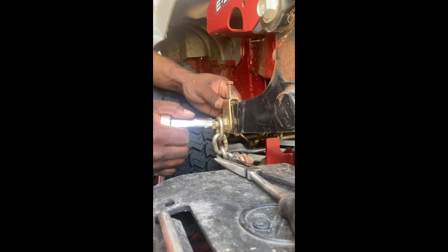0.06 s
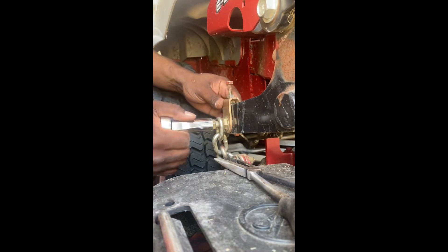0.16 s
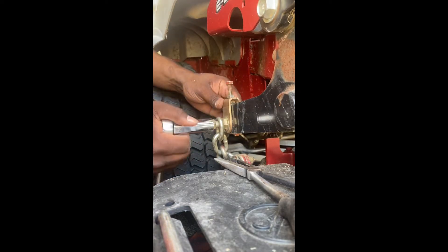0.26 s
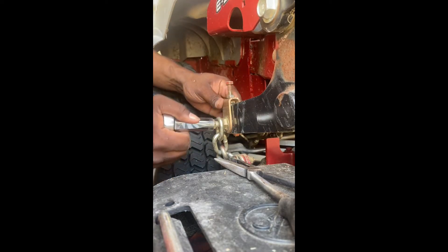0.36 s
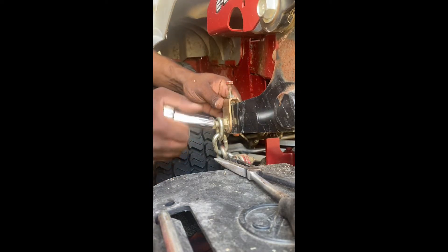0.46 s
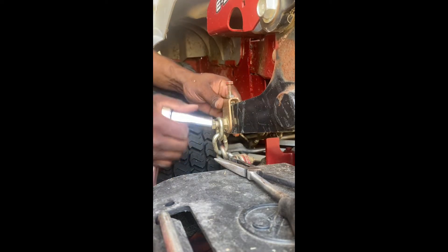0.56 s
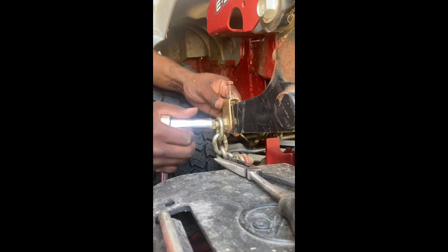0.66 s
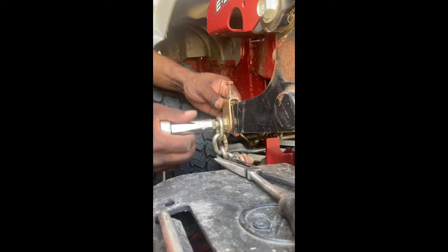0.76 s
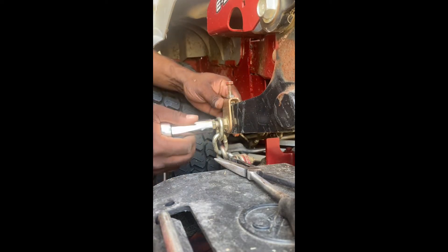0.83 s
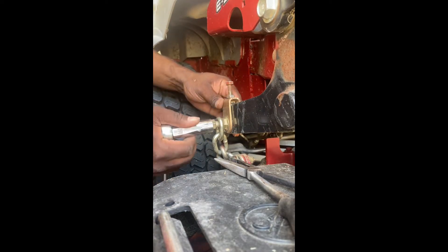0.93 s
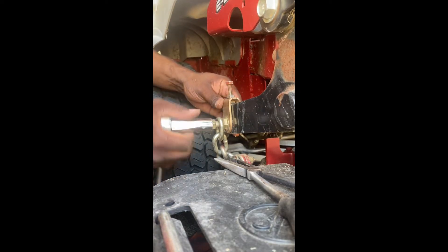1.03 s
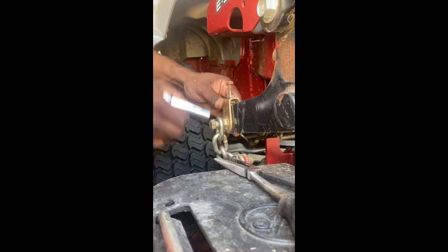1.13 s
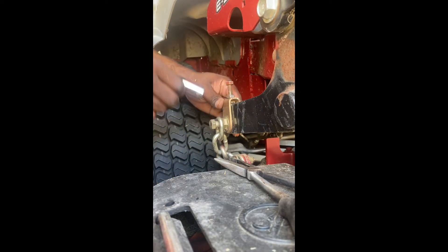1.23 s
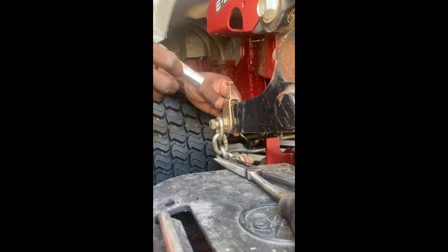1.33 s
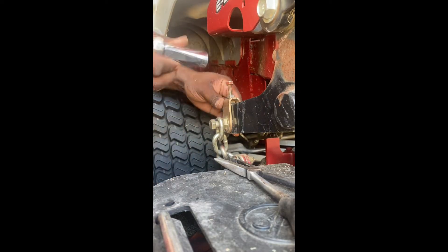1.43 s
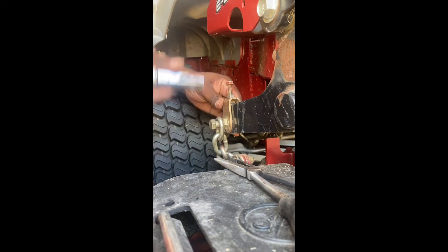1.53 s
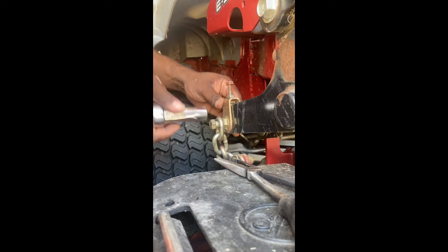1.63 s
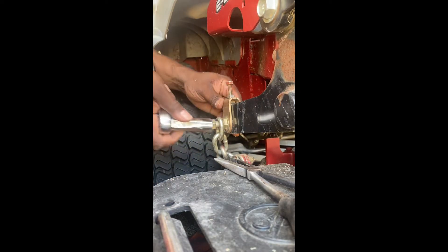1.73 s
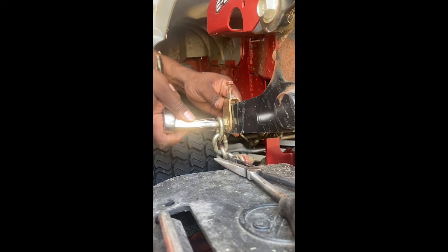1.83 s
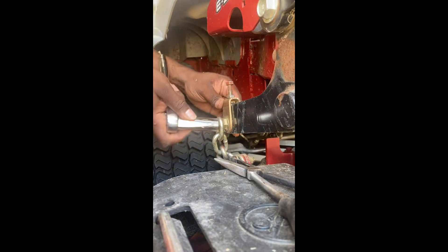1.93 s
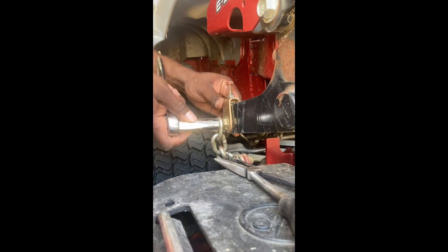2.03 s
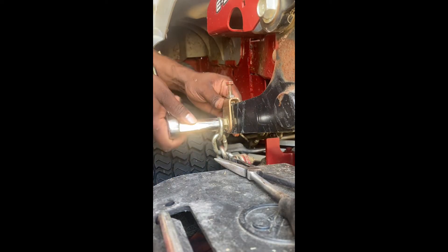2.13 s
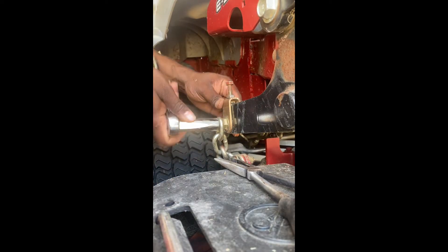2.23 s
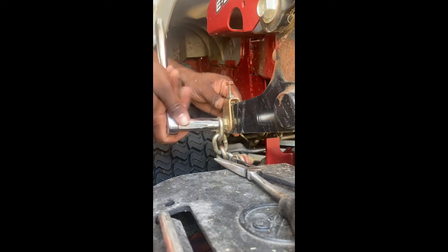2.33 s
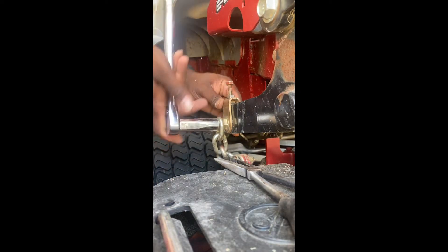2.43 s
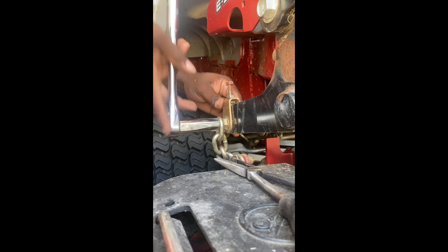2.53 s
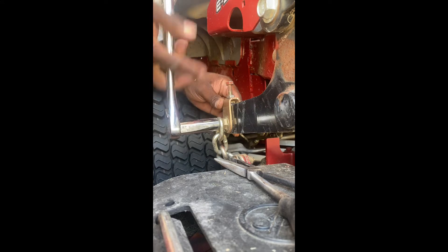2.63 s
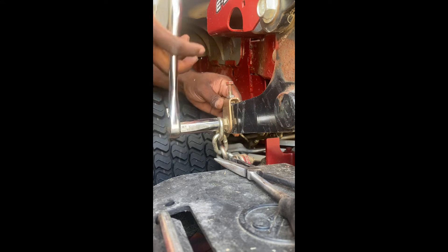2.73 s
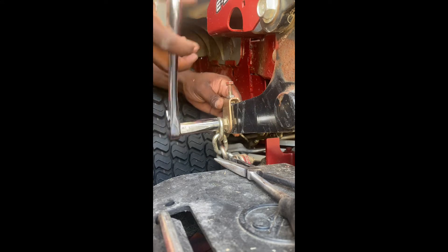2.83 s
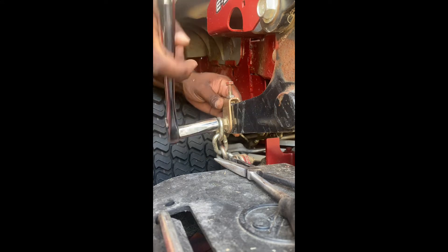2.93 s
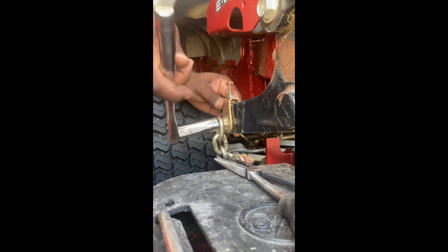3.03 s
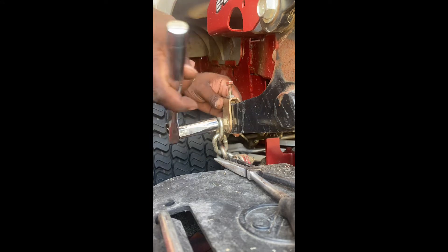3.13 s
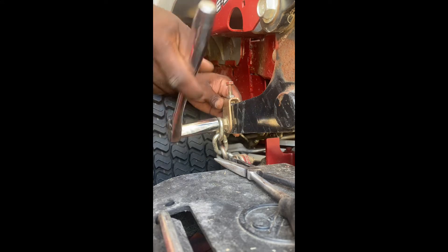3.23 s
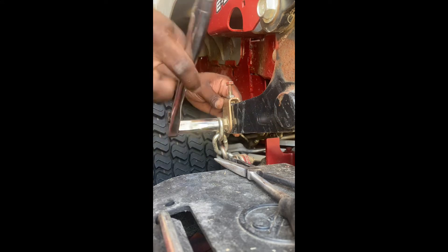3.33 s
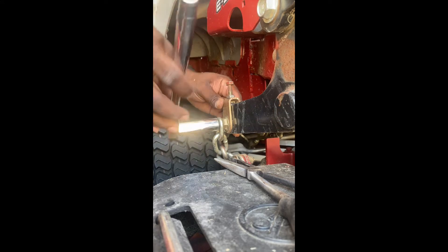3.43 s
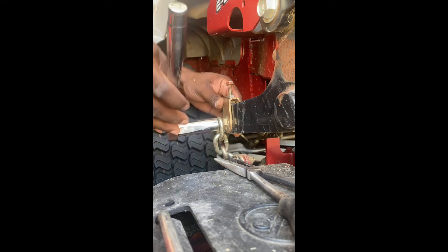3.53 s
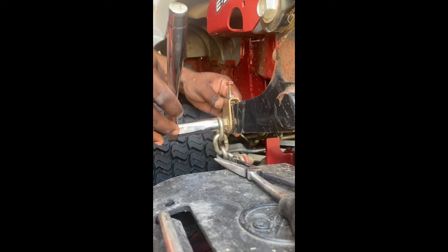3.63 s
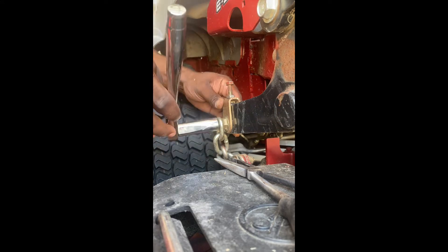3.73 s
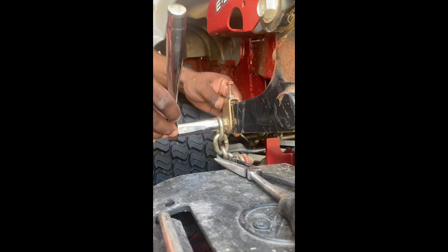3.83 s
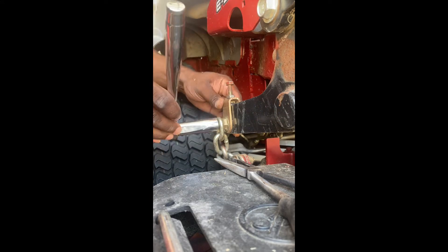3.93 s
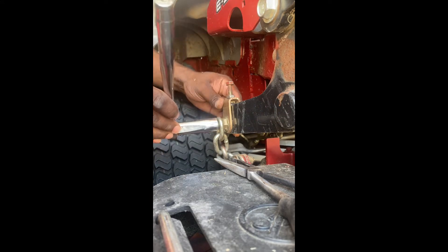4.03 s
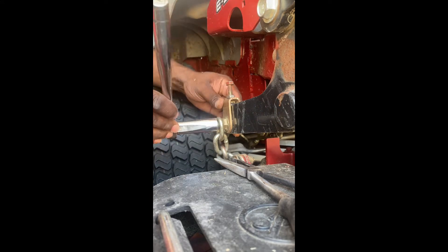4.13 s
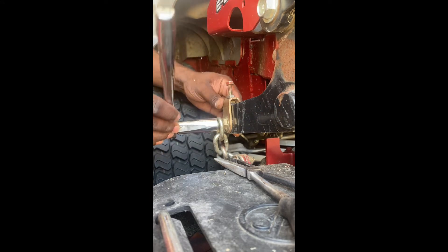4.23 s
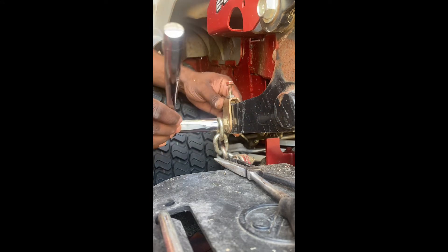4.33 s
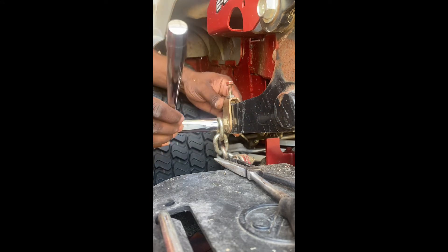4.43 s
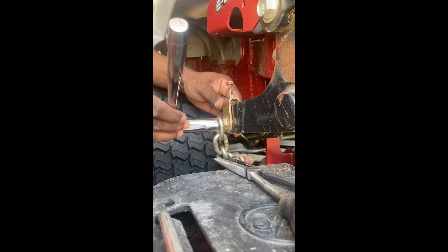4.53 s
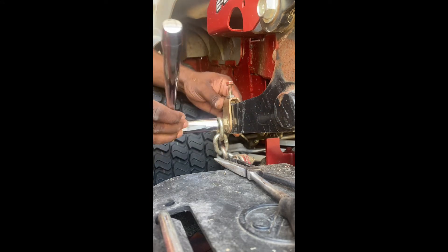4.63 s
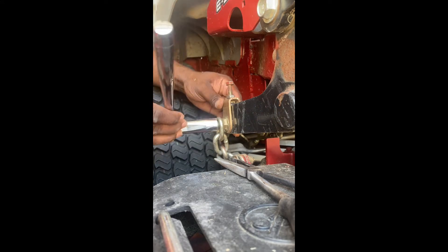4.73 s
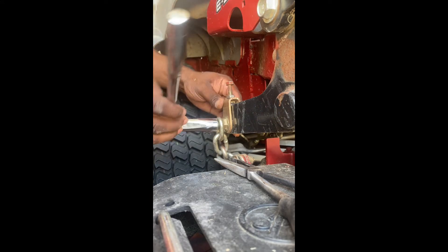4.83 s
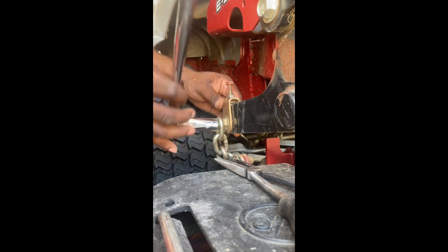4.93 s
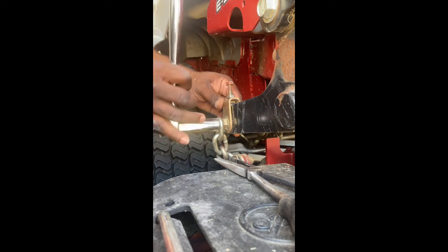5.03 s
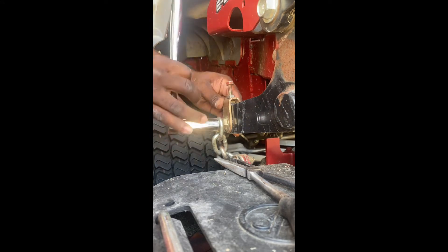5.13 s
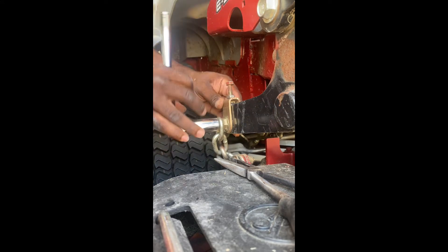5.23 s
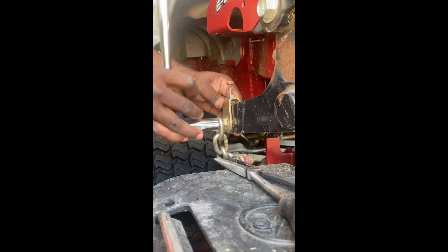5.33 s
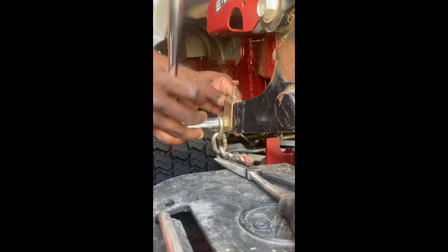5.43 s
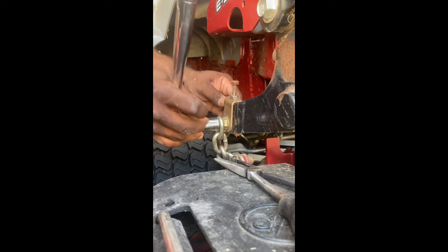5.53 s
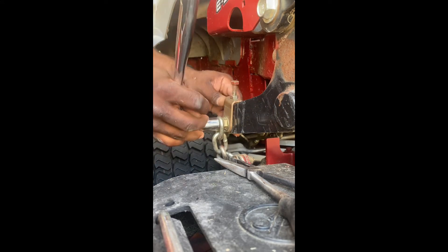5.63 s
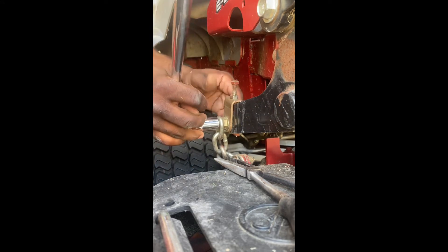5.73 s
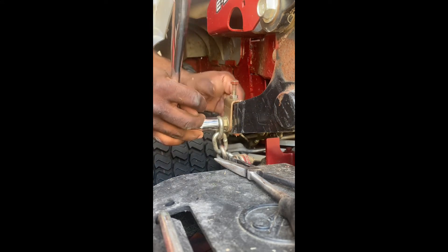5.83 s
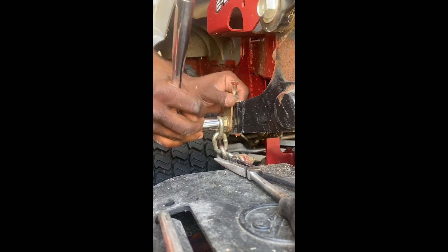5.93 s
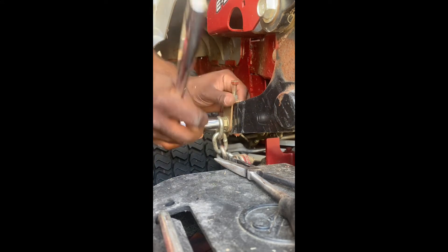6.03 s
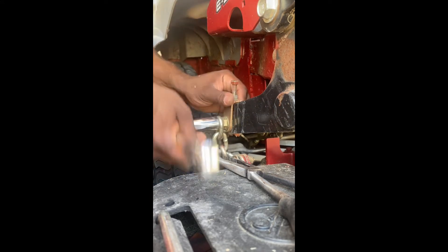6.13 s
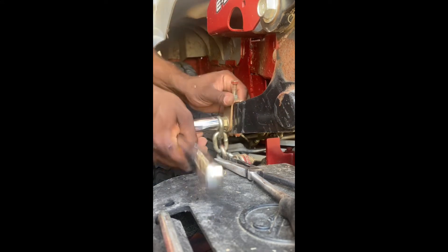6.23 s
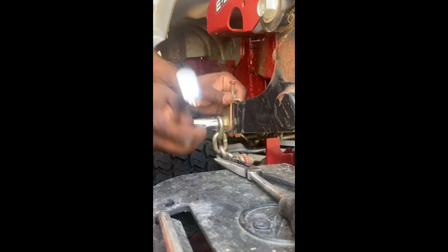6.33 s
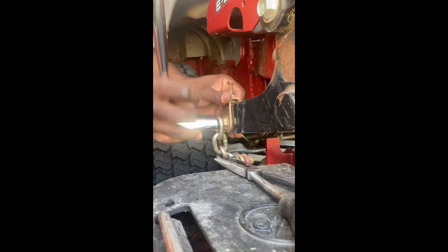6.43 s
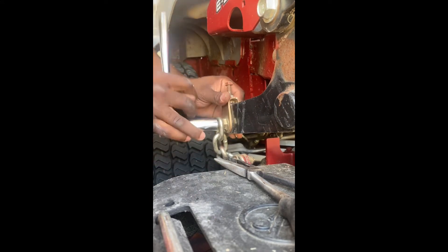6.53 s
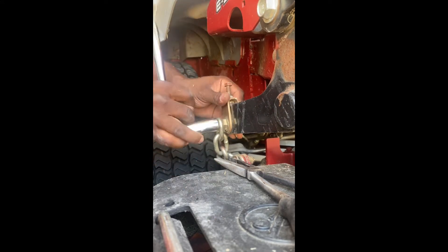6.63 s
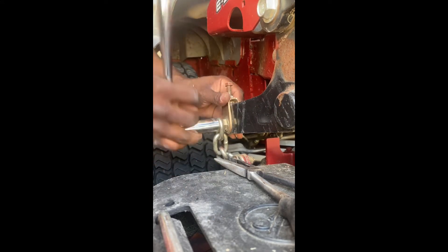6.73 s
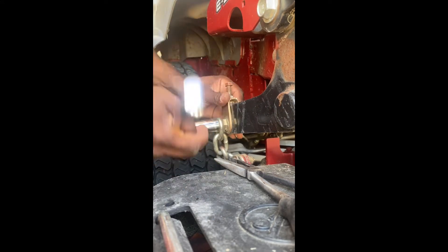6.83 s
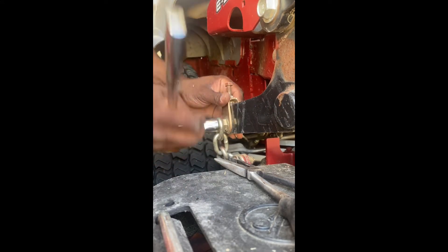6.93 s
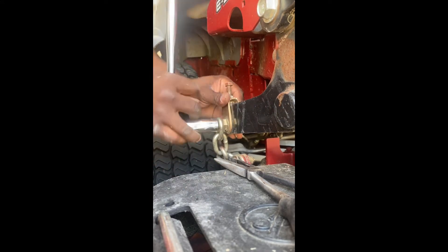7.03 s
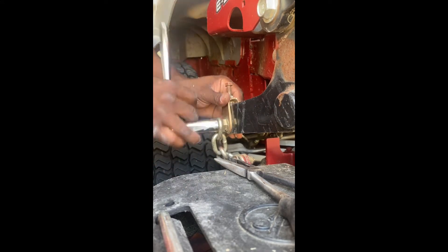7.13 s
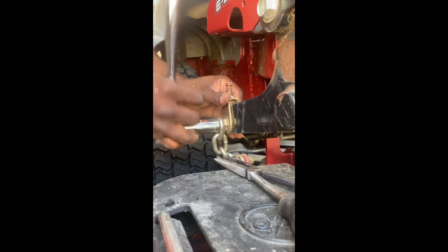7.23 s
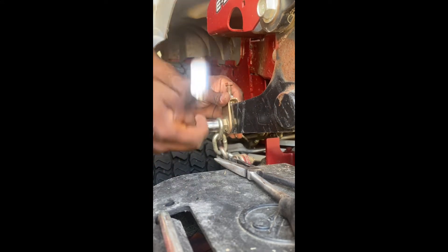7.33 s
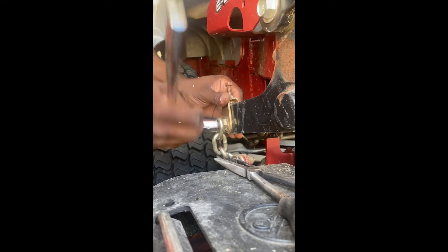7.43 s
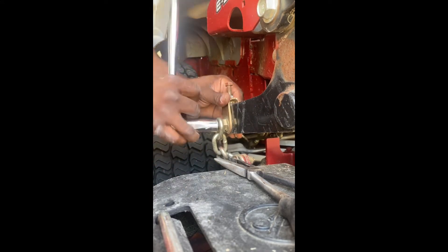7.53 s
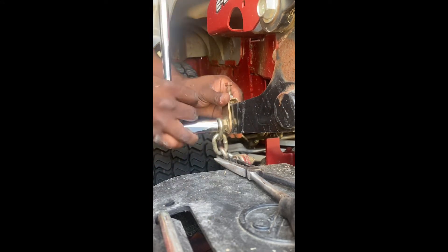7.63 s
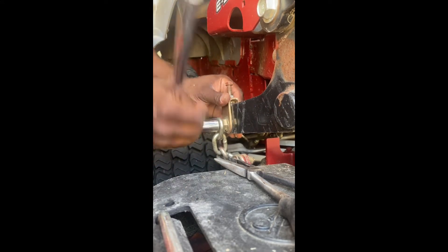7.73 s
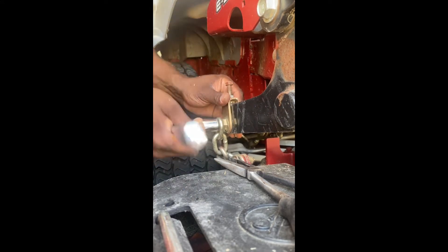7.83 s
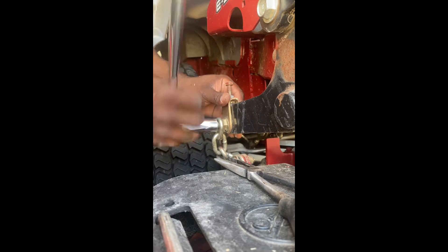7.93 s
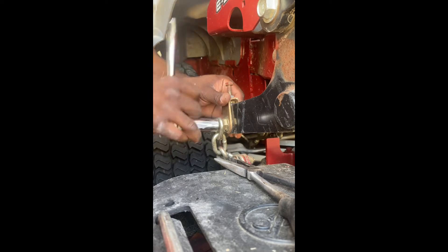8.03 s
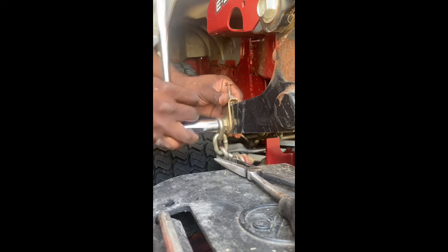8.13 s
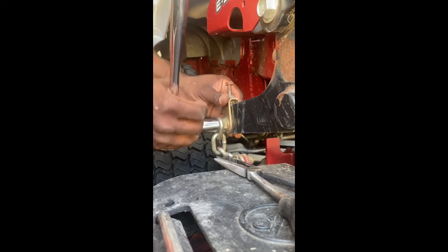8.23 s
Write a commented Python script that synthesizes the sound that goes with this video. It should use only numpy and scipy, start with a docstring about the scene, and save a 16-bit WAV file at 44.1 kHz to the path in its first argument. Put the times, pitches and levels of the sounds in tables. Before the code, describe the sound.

Close metallic clacks and small fumbling knocks, then short runs of rapid ratchet clicks on a heavy steel frame, with faint low hum behind.

```python
"""A socket ratchet works a bolt on the steel frame of a small machine in a garage.
The pawl snaps once per gear tooth: chattering contacts excite the head, and the handle rings in gliding sines.
Socket and handle clack against the bolt through parallel resonators; blows thump the frame and buzz its panels.
Hands rub on steel and cloth as shaped noise and touch it with light ticks; reflections follow as decaying noise.
A low room rumble of coloured noise with a mains hum and a deep drone lies below."""
import sys
import numpy as np
from scipy import signal
from scipy.fft import rfft, irfft, next_fast_len
from scipy.io import wavfile

SR = 44100
rng = np.random.default_rng(int(sys.argv[2]) if len(sys.argv) > 2 else 0)


def magnitude_from_level(level_db):
    """Linear magnitude for a level in decibels (20 dB per decade)."""
    exponent = np.asarray(level_db, float) / 20
    return 10 ** exponent


def generate_wav(sig):
    """Save sig (samples, or channels by samples) to the path in sys.argv[1] as 16-bit PCM at SR."""
    pcm = np.round(np.clip(np.atleast_2d(sig).T, -1, 1) * 32767).astype(np.int16)
    wavfile.write(sys.argv[1], SR, pcm)


N = 364707


def rms_one(x):
    """Normalisation: scale to rms 1."""
    return x / np.sqrt(np.mean(x ** 2) + 1e-20)


def at_hz(points, hz):
    """Spectral interpolation: read a (frequency, value) table on a log-frequency axis."""
    table_hz, value = np.transpose(points)
    return np.interp(np.log(hz + 1), np.log(table_hz + 1), value)


def over_time(points):
    """Envelope: read a (time, value) table at every sample."""
    return np.interp(np.arange(N) / SR, *np.transpose(points))


def filtered(x, edges_hz, kind, order=2):
    """Butterworth filtering: maximally flat in the pass band."""
    return signal.sosfilt(signal.butter(order, edges_hz, kind, fs=SR, output="sos"), x)


def coloured(spectrum, channels):
    """Spectral shaping: white noise weighted to the given spectrum, rms 1."""
    white = rfft(rng.standard_normal((channels, N)))
    return rms_one(irfft(white * magnitude_from_level(at_hz(spectrum, np.fft.rfftfreq(N, 1 / SR))), N))


def drift(rate_hz):
    """Low-pass random process: slow chance of rms 1, drawn 40 times a second."""
    steps = rng.standard_normal(int(N / SR * 40) + 2)
    memory = np.exp(-2 * np.pi * rate_hz / 40)
    wander = rms_one(signal.lfilter([1], [1, -memory], steps))
    return np.interp(np.arange(N) / SR * 40, np.arange(len(steps)), wander)


def clicks(times_s, sizes):
    """Impulsive excitation: one impulse at each time."""
    out = np.full(N, 1e-18)
    at = np.round(np.asarray(times_s) * SR).astype(int)
    np.add.at(out, np.clip(at, 0, N - 1), sizes)
    return out


def contact(train, rise_s, fall_s):
    """Contact chatter: pushes of random sign under a quick rise and a slower fall (time constants)."""
    t = np.arange(int(.2 * SR)) / SR
    shape = (1 - np.exp(-t / rise_s)) * np.exp(-t / fall_s)
    pressure = signal.oaconvolve(train, shape / shape.max())[:N]
    return pressure * np.sign(rng.standard_normal(N)) + 1e-18


def ring(force, hz, t60):
    """Modal resonance: a unit click sets a decaying sine of height 1 ringing."""
    r, w = magnitude_from_level(-60 / (t60 * SR)), 2 * np.pi * hz / SR
    return signal.lfilter([0, np.sin(w)], [1, -2 * r * np.cos(w), r * r], force)


def shares(hits, resonances, memory):
    """Modal participation: each hit shares its force by chance, much as its neighbour in the list did."""
    luck = rng.standard_normal((len(hits), len(resonances)))
    alike = np.clip(memory, 0, .95)
    return signal.lfilter([np.sqrt(1 - alike * alike)], [1, -alike], luck.T).T


def struck(times_s, db, resonances, spread_db, rise_s, fall_s, memory):
    """Source and filter: contact bursts drive parallel resonances of given bandwidth."""
    out, luck = 0, shares(times_s, resonances, memory)
    luck = luck - luck.mean(axis=1, keepdims=True)      # the colour changes, the mean level in dB stays
    for k, (hz, width_hz, level_db) in enumerate(resonances):
        sizes = magnitude_from_level(db + level_db + spread_db * luck[:, k])
        force = contact(clicks(times_s, sizes), rise_s, fall_s)
        r = np.exp(-np.pi * width_hz / SR)
        poles = [1, -2 * r * np.cos(2 * np.pi * hz / SR), r * r]
        out = out + signal.lfilter([1, 0, -1], poles, force) * np.sqrt(1 - r * r) / 2
    return out


def strokes(start_s, length_s, db, rise_db_per_s, fade_db_per_s):
    """Exponential envelope: gestures rise to their start, hold and fade; the loudest sets the level in dB."""
    t = np.arange(0, N / SR + .01, .01)[:, None]
    before, after = np.maximum(start_s - t, 0), np.maximum(t - start_s - length_s, 0)
    level = db - rise_db_per_s * before - fade_db_per_s * after
    return np.interp(np.arange(N) / SR, t[:, 0], level.max(axis=1))


# rumble spectrum: frequency_hz, relative_level_db (per Hz)
RUMBLE_SPECTRUM = [(15, -42.5), (28, -33), (45, -5), (124, -1.5), (174, -8), (349, -9.5), (718, -30.5),
                   (1410, -38.5), (1870, -34.5), (2900, -46.5), (12000, -62.5), (15600, -94.5)]


def room_tone():
    """Coherence: the rumble is alike at both microphones in the bass; an unsteady hum and a deep drone join."""
    shared, own = coloured(RUMBLE_SPECTRUM, channels=1), coloured(RUMBLE_SPECTRUM, channels=2)
    own = filtered(own, 500, "high", order=1)
    rumble = magnitude_from_level(-56 + 0.5 * drift(2.4)) * (shared + 2.3 * own)
    hum_hz, hum_db = 121 + 1.9 * drift(3.6), -53.5 + 2.0 * drift(6.2)
    drone_hz, drone_db = 47.3 + 2.8 * drift(3.0), -62 + 1.8 * drift(4.0)
    hum = np.sin(2 * np.pi * np.cumsum(hum_hz) / SR) * magnitude_from_level(hum_db)
    drone = np.sin(2 * np.pi * np.cumsum(drone_hz) / SR) * magnitude_from_level(drone_db)
    return rumble + hum + drone


# skin and cloth sliding on steel: start_s, length_s, level_db
RUB_STROKES = [(0, 0.62, -70.5), (0.753, 0.14, -63), (1.086, 0.031, -61), (1.9, 0.55, -60),
               (2.306, 0.93, -61), (3.96, 0.21, -69.5), (5.403, 0.029, -52.5), (5.915, 1, -59),
               (6.65, 0.64, -49), (7.505, 0.92, -48.5)]


def rub_level():
    """Sliding friction: the level in dB swells with each stroke above a resting floor."""
    moving_db = strokes(*np.transpose(RUB_STROKES), rise_db_per_s=89.5, fade_db_per_s=74.5)
    return np.maximum(-85.5, moving_db)


# spectrum of the rubbing: frequency_hz, relative_level_db (per Hz)
RUB_SPECTRUM = [(500, -24.5), (1000, 6), (2500, -1), (4300, -3), (4800, -16), (5400, -6), (9500, -8),
                (12000, -13), (20000, -27)]


def rubbing(rub_db):
    """Friction noise: skin and cloth rub in patches whose colour shifts band by band."""
    noise, edges_hz = coloured(RUB_SPECTRUM, channels=1)[0], np.geomspace(500, 16000, 9)
    bands = [filtered(noise, edge, "band") for edge in zip(edges_hz, edges_hz[1:])]
    patches = sum(band * magnitude_from_level(4.0 * drift(5.0)) for band in bands)
    return magnitude_from_level(rub_db + 2.6 * np.tanh(drift(12.0))) * patches


# steady sway under the leaning hands: time_s, level_db
SWAY_LEVEL = [(0, -59), (2.402, -64), (2.799, -52), (4.8, -58), (8.27, -48)]
# the machine jolts on its tyres: time_s, level_db
TYRE_JOLTS = [(.38, -43), (0.899, -33), (2.6, -42), (6.23, -44)]
# spectrum of the rocking: frequency_hz, relative_level_db (per Hz)
ROCKING_SPECTRUM = [(25, -32.5), (45, -10), (80, -5.5), (130, -7), (250, -34.5), (1000, -76.5)]


def rocking():
    """Rigid-body motion: low noise as the machine sways under the hands and jolts on its tyres."""
    jolt_s, jolt_db = np.transpose(TYRE_JOLTS)
    jolting_db = strokes(jolt_s, 0, jolt_db, rise_db_per_s=152, fade_db_per_s=97)
    rock_db = np.maximum(over_time(SWAY_LEVEL), jolting_db)
    return magnitude_from_level(rock_db) * coloured(ROCKING_SPECTRUM, channels=1)[0]


# metal meets metal: start_s, clack_db, treble_db, frame_thump_db (all relative)
METAL_BLOWS = [(0.0014, -15.5, -30.5, -24), (0.0143, -27, -28.5, -63), (0.0556, -35, -51, -45),
               (0.5136, -41.5, -53, -41), (0.5461, -32, -47, -35.5), (0.5614, -26.5, -61.5, -41),
               (0.617, -2, -19.5, -27.5), (0.7689, -28, -33.5, -57), (0.7962, -25, -35.5, -46),
               (0.8454, -31.5, -52, -37), (1.8187, -15, -27, -29), (1.849, -15.5, -37.5, -27.5),
               (2.0103, -11, -10.5, -29.5), (2.3254, -45.5, -45.5, -34.5), (2.5424, -46.5, -47, -27),
               (2.6878, -45, -83, -34.5), (3.2763, -63.5, -89.5, -41), (3.7358, -46.5, -100.5, -59.5),
               (4.1084, -51, -56.5, -50), (4.2538, -30, -51.5, -35.5), (4.2926, -27, -19, -38),
               (4.8622, -58.5, -33, -41.5), (5.0866, -31.5, -35, -33.5), (5.269, -47, -86, -37),
               (5.3186, -38, -47.5, -35.5), (5.3895, -42, -40.5, -34.5), (5.4661, -26.5, -31.5, -29),
               (5.6773, -31, -27, -28.5), (5.8714, -36.5, -73, -31.5), (6.131, -36.5, -44, -49),
               (6.2027, -36, -53.5, -47), (6.6422, -31, -26.5, -29.5), (6.6604, -34, -37.5, -34),
               (6.7359, -61.5, -35, -39), (6.8956, -32.5, -44.5, -35.5), (6.9528, -25.5, -31, -43),
               (7.1643, -23.5, -32, -31), (7.1875, -39.5, -26, -32.5), (7.46, -28, -46.5, -38),
               (7.677, -38.5, -53.5, -27), (7.6835, -43.5, -41.5, -38.5), (7.77, -38.5, -42.5, -75),
               (7.9182, -18, -22, -33), (8.1399, -29.5, -27.5, -31.5)]
# hands leaning on the frame: time_s, relative_level_db
LEANING = [(0, -33), (2.3, -52.5), (3.3, -47.5), (4.9, -72), (5.3, -55.5), (8.27, -20.5)]
# frame modes: pitch_hz, relative_level_db, t60_s (before the damping factor below)
FRAME_MODES = [(130, -9.5, 0.24), (239.3, -4, 0.47), (284, -14.5, 0.5), (310.1, -11.5, 1),
               (350, -4.5, 0.24), (378, -4, 0.23), (425.7, -5, 0.51), (531.5, 3, 0.17), (702, -4.5, 0.11),
               (1074, -10, 0.64)]


def frame(snap_s, snap_db):
    """Modal superposition: slow thumps, leaning hands and pawl snaps all drive the heavy frame."""
    damping = 0.32     # multiplies every t60 of the table
    s, *_, thump_db = np.transpose(METAL_BLOWS)
    shaking = contact(clicks(snap_s, magnitude_from_level(snap_db - 45.5)), rise_s=0.00044, fall_s=0.0071)
    push = magnitude_from_level(over_time(LEANING) - 43.0 + 0.78 * drift(9.9))
    luck = shares(s, FRAME_MODES, memory=0.093)
    out = 0
    for k, (hz, db, t60) in enumerate(FRAME_MODES):
        sizes = magnitude_from_level(thump_db - 29 + 3 * luck[:, k])
        thumps = contact(clicks(s, sizes), rise_s=0.007, fall_s=0.038)
        force = thumps + push * rng.standard_normal(N) + shaking
        out = out + magnitude_from_level(db) * ring(force, hz, t60 * damping)
    return out


# socket and bolt resonances: pitch_hz, width_hz, relative_level_db
SOCKET_BODY = [(1417, 690, -12), (1620, 220, -8), (2400, 450, -4), (3100, 400, -3), (3880, 550, 0)]
# their treble: pitch_hz, width_hz, relative_level_db
SOCKET_BRIGHT = [(5900, 420, -9), (6180, 340, -16.5), (7230, 1200, -3), (9650, 820, -3.5),
                 (11500, 1600, -4.5)]
# thin modes of the socket: pitch_hz, relative_level_db, t60_s
THIN_MODES = [(1900, -13, .1), (3650, -9, .09), (5300, -13, .06), (5830, -15, .1), (8300, -22, .06)]
# a loose plate that rings long: pitch_hz, relative_level_db, t60_s
LOOSE_PLATE = [(334, -40, 4.), (425, -36, 1.2), (501, -42, 3.), (668, -53, 3.), (877, -45, 2.6),
               (2750, -56, 2.)]


def clacks():
    """Impact excitation: socket on bolt gives a crack, a clack, a treble that dies sooner and ringing modes."""
    s, db, treble_db, _ = np.transpose(METAL_BLOWS)
    body = struck(s, db - 17.0, SOCKET_BODY, spread_db=-0.5, rise_s=0.0021, fall_s=0.017, memory=.1)
    crack = struck(s, db - 6.5, SOCKET_BODY, spread_db=1.5, rise_s=0.00083, fall_s=0.0025, memory=.1)
    treble = struck(s, treble_db - 1.0, SOCKET_BRIGHT, spread_db=1.0, rise_s=.0006, fall_s=0.0036, memory=.1)
    # the loose socket rattles on; its strength is capped before chance is added
    strength_db = np.minimum((db + treble_db) / 2, -37)
    sings = 0
    for hz, level_db, t60 in THIN_MODES:
        hit_db = strength_db + 4.0 * rng.standard_normal(len(s))
        rattle = contact(clicks(s, magnitude_from_level(hit_db + level_db - 25)), rise_s=.004, fall_s=.035)
        sings = sings + ring(rattle, hz, t60)
    # doubled decibels: hardly any but the hardest blows reach the loose plate
    plate = sum(ring(clicks(s, magnitude_from_level(2 * db + level_db)), hz, t60) for hz, level_db, t60 in LOOSE_PLATE)
    return body + crack + treble + sings + plate


# sheet-metal panels, modes too dense to tell apart: pitch_hz, width_hz, relative_level_db
PANEL_BANDS = [(780, 240, 1), (990, 690, 5.5), (1520, 940, -4.5), (1780, 400, 2.5), (2320, 230, -4.5)]


def panels(snap_s, snap_db):
    """High modal density: broad bands buzz after a blow both hard and heavy, and faintly under every snap."""
    s, db, _, thump_db = np.transpose(METAL_BLOWS)
    after_blows = struck(s, (db + thump_db) / 2 - 14.5, PANEL_BANDS,
                         spread_db=6.0, rise_s=0.019, fall_s=0.012, memory=0.052)
    under_snaps = struck(snap_s, snap_db - 37.5, PANEL_BANDS,
                         spread_db=-6.5, rise_s=0.0027, fall_s=0.029, memory=0.31)
    return after_blows + under_snaps


# reverberation by band: centre_hz, t60_s, relative_level_db
GARAGE_BANDS = [(150, .6, -21.5), (494, 1, -5.5), (1100, 0.27, 1), (2014, 0.74, -7), (3460, 0.43, -13),
                (7100, 0.33, -20), (11300, 0.17, -19.5)]


def garage(x):
    """Diffuse reverberation: noise that dies band by band, different at each microphone."""
    t, hz = np.arange(SR) / SR, np.array(GARAGE_BANDS)[:, 0]
    edges_hz = np.concatenate([[60], np.sqrt(hz[1:] * hz[:-1]), [15000]])
    tail = 0
    for (_, t60, db), low, high in zip(GARAGE_BANDS, edges_hz, edges_hz[1:]):
        band = filtered(rng.standard_normal((2, SR)), [low, high], "band")
        even_energy = np.sqrt(2 * np.log(1000) / (t60 * SR))     # whatever the decay time
        tail = tail + magnitude_from_level(db - 60 * t / t60) * even_energy * band
    onset = 1 - np.exp(-t / .004)      # the first walls answer after a few milliseconds
    return signal.fftconvolve(x[None], tail * onset, axes=1)[:, :N]


# light touches of tool and fingers: start_s, relative_level_db
LIGHT_TOUCHES = [(.3385, -53), (.3978, -60.5), (1.0507, -64.5), (1.4231, -59), (3.4065, -58.5),
                 (3.4793, -56), (4.1344, -46), (4.3594, -50), (4.539, -54.5), (4.902, -53), (5.811, -51),
                 (5.935, -48.5), (5.995, -42), (6.2737, -45), (6.858, -42), (7.2794, -36), (7.868, -43)]


def ticks(rub_db):
    """Short contacts: light touches, each of its own colour, and fainter random ones that follow the rubbing."""
    faint_per_s = 6
    faint = np.flatnonzero(rng.random(N) < faint_per_s / SR)
    faint_db = rub_db[faint] + 3 + 3 * rng.standard_normal(len(faint))
    s, db = np.hstack([np.transpose(LIGHT_TOUCHES), [faint / SR, faint_db]])
    dull_treble = [(hz, width_hz, level_db - 7) for hz, width_hz, level_db in SOCKET_BRIGHT]
    return struck(s, db, SOCKET_BODY + dull_treble, spread_db=5.0, rise_s=0.00027, fall_s=0.001, memory=.3)


# dull low knocks of the frame: start_s, level_db, pitch_hz, t60_s
FRAME_KNOCKS = [(0.623, -9, 402.3, 0.052), (6.2096, -19, 350, 0.028)]


def frame_knocks():
    """Damped oscillation: each dull low knock of the frame is one short damped sine."""
    return sum(ring(clicks([s], magnitude_from_level(db)), hz, t60) for s, db, hz, t60 in FRAME_KNOCKS)


# back-swings of the handle, one list each: start_s, snap_db (relative)
BACK_SWINGS = [
    [(2.3622, -21.5), (2.3891, -20), (2.4418, -20), (2.4878, -25), (2.5625, -32), (2.6053, -32.5)],
    [(2.7207, -31), (2.7646, -22.5), (2.792, -22), (2.8463, -29.5), (2.8916, -27), (2.9858, -24),
     (3.0065, -22), (3.0275, -24), (3.0596, -32), (3.1576, -29.5)],
    [(4.9465, -25.5), (5.0065, -22.5), (5.0524, -28), (5.0727, -27.5), (5.1003, -23.5), (5.1151, -31),
     (5.1645, -27.5), (5.2274, -27.5)],
    [(6.389, -25.5), (6.4049, -26.5), (6.4205, -20.5), (6.4841, -25), (6.5777, -28.5), (6.5966, -24.5),
     (6.6111, -32)],
    [(6.9788, -22.5), (7.0189, -24.5), (7.0962, -26), (7.1238, -25.5), (7.1455, -25)],
    [(7.484, -22.5), (7.5105, -24), (7.5942, -24.5), (7.6018, -25.5), (7.6252, -35.5)],
    [(7.944, -21.5), (7.9684, -16.5), (7.9865, -23.5), (8.045, -25.5), (8.0555, -21.5), (8.0879, -29)],
]
# teeth passed at each point of a swing, one row per swing: tooth_count
TEETH_PASSED = [(0, 2, 5, 7, 9, 10), (0, 1, 2, 4, 5, 9, 10, 11, 12, 14), (0, 4, 7, 8, 10, 11, 13, 16),
                (0, 1, 2, 8, 19, 21, 22), (0, 5, 17, 21, 23), (0, 4, 18, 19, 21), (0, 4, 7, 18, 20, 23)]
# grip of each swing: low_head_db, then relative to the snap: low_ring_db, middle_ring_db, top_ring_db
SWING_GRIPS = [(3.5, -12, 8, 5), (2.5, -5, -25, 0), (0, -8.5, -23, 0), (0, -1, 2, 11.5), (0, -0.5, 16, 7.5),
               (-2, -10.5, 15, 7), (-4.5, -3, 13, 11.5)]
# rings gliding as the handle turns: low_first_hz, low_last_hz, middle_first_hz, middle_last_hz,
# freest_share (of the swing, where the low ring is freest)
RING_GLIDES = [(3500, 3900, 6400, 5600, .2), (3800, 3830, 6400, 5600, .83), (3700, 3900, 6400, 5600, .22),
               (3250, 3950, 6000, 5300, .62), (3800, 3400, 6050, 5300, .82), (3750, 3400, 6500, 5150, .1),
               (3500, 3650, 5800, 5700, .85)]
# change of the upper rings along the arc: swing_share, middle_db, top_db
RING_ARC = [(0, -12, -5), (.18, -13, -5), (.35, -12, -22), (0.648, -8.5, -8), (.85, -17, -0.5),
            (1, -17, -11.5)]


def snaps():
    """Kinematics: one snap per tooth as the handle's angle runs smoothly through each swing's points."""
    jitter_s, spread_db, low_ring_loss_db, top_ring_hz = 0.00027, 1.5, 116, 7270
    arc, arc_middle_db, arc_top_db = np.transpose(RING_ARC)
    out = []
    for swing, passed, grip, glide in zip(BACK_SWINGS, TEETH_PASSED, SWING_GRIPS, RING_GLIDES):
        (s, db), passed = np.transpose(swing), np.array(passed)
        weight_db, low_db, middle_db, top_db = grip
        low_first, low_last, middle_first, middle_last, freest = glide
        tooth, pace = np.arange(passed[-1] + 1), np.gradient(s, passed)
        # cubic Hermite interpolation of time against tooth
        i = np.minimum(np.searchsorted(passed, tooth, "right") - 1, len(s) - 2)
        span = np.diff(passed)[i]
        u = (tooth - passed[i]) / span
        when = s[i] + np.diff(s)[i] * u * u * (3 - 2 * u)
        when = when + span * u * (1 - u) * ((1 - u) * pace[i] - u * pace[i + 1])
        luck = rng.standard_normal((len(tooth), 2))
        snap_db = np.interp(tooth, passed, db) + spread_db * luck[:, 1]
        share = tooth / tooth[-1]
        rings = [low_db - low_ring_loss_db * (share - freest) ** 2,
                 low_first + share * (low_last - low_first),
                 middle_db + np.interp(share, arc, arc_middle_db),
                 middle_first + share * (middle_last - middle_first),
                 top_db + np.interp(share, arc, arc_top_db),
                 top_ring_hz + 0 * share]
        out.append([when + jitter_s * luck[:, 0], snap_db, weight_db + 0 * when, *rings])
    return np.concatenate(out, axis=1)


# bands of a snap, head resonances up to about 11 kHz plus a broad hiss on top:
# pitch_hz, width_hz, relative_level_db
SNAP_BANDS = [(2620, 440, -6), (3294, 540, -7), (4090, 1600, -2.5), (6220, 1200, -36.5), (7110, 540, -4),
              (8705, 1200, -4.5), (9500, 1700, -7), (11100, 950, -4), (13400, 3000, 0.5)]
# low, middle and top ring of the handle: t60_s, pitch_scatter (from snap to snap, as a share)
HANDLE_RINGS = [(.04, .012), (.012, .03), (.011, .02)]


def pawl(s, db, weight_db, *handle):
    """Impact and free vibration: bright snaps in the head; the handle rings on where the grip leaves it free."""
    low = [r for r in SNAP_BANDS if r[0] < 4500]
    high = [r for r in SNAP_BANDS if r[0] > 4500]
    snap = struck(s, db + weight_db - 10, low, spread_db=7.5, rise_s=0.00028, fall_s=0.0018, memory=0.56)
    snap = snap + struck(s, db - 6, high, spread_db=4.0, rise_s=0.0008, fall_s=0.0017, memory=0.75)
    # up the next tooth's flank
    slide = struck(s, db - 28.5, SNAP_BANDS, spread_db=-3.5, rise_s=0.017, fall_s=0.012, memory=0.52)
    t, rise_s = np.arange(SR // 10) / SR, 0.0014
    rings, at = np.zeros(N + SR), (s * SR).astype(int)[:, None] + np.arange(SR // 10)
    for k, (t60, scatter) in enumerate(HANDLE_RINGS):
        free_db, hz = handle[2 * k:2 * k + 2]
        level_luck, sign_luck, pitch_luck = rng.standard_normal((3, len(s)))
        pitch = hz * (1 + scatter * pitch_luck)
        size = magnitude_from_level(db + free_db + 2.0 * level_luck) * np.sign(sign_luck)
        shape = (1 - np.exp(-(t / rise_s) ** 2)) * magnitude_from_level(-60 * t / t60)
        np.add.at(rings, at, size[:, None] * shape * np.sin(2 * np.pi * pitch[:, None] * t))
    return snap + slide + rings[:N]


def scene():
    """Superposition: the work close by, its echoes, the room."""
    rub_db = rub_level()
    snap_s, snap_db, weight_db, *handle = snaps()
    hands = rubbing(rub_db) + ticks(rub_db)
    ratchet = pawl(snap_s, snap_db, weight_db, *handle)
    machine = rocking() + frame(snap_s, snap_db) + frame_knocks() + panels(snap_s, snap_db + weight_db)
    near = ratchet + clacks() + hands + machine
    return near + garage(near) + room_tone()


def low_pass(x):
    """Removes everything above the highest recorded frequency."""
    return signal.sosfilt(signal.butter(12, 16000, fs=SR, output="sos"), x)


# phase between the microphones: frequency_hz, left_lead_rad
PORT_PHASE = [(0, 0), (350, -.85), (690, -1.5), (980, -2.3), (1200, -5.2), (1900, -5.7), (2400, -5.1),
              (2900, -4.8), (3600, -5.4), (4600, -4.3), (5000, -.6), (5500, .3), (6500, 1.1), (8600, 1.8),
              (12700, 3.1)]
# level between the microphones: frequency_hz, left_minus_right_db
PORT_BALANCE = [(200, 1), (350, -0.5), (630, -5.5), (1140, -0.5)]
# overall top-end roll-off of the finished sound, above about 11 kHz: frequency_hz, level_db
TOP_ROLL_OFF = [(11300, -1.5), (12200, -11.5), (16000, -10.5)]


def record(dry):
    """Diffraction and saturation: two ports differ by frequency; the top end rolls off, peaks are rounded."""
    size = next_fast_len(N + 4096)
    hz, side = np.fft.rfftfreq(size, 1 / SR), np.array([[.5], [-.5]])
    phase = np.exp(1j * side * np.interp(hz, *np.transpose(PORT_PHASE)))
    response = phase * magnitude_from_level(side * at_hz(PORT_BALANCE, hz) + at_hz(TOP_ROLL_OFF, hz))
    heard = irfft(rfft(dry, size) * response, size)[:, :N]
    rounded = heard / (1 + heard ** 4) ** 0.22
    return low_pass(rounded)


dry = scene()
out = record(dry)
generate_wav(out)
```